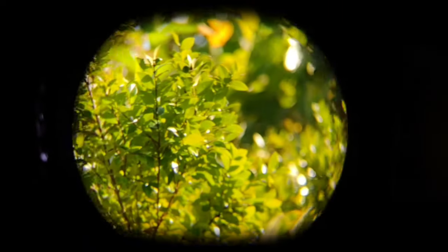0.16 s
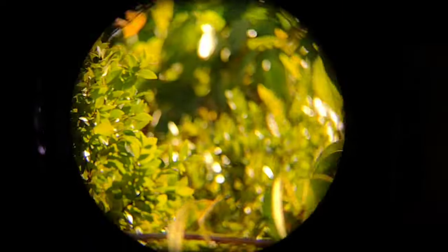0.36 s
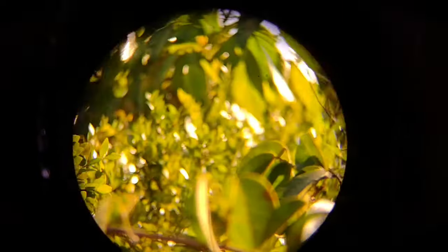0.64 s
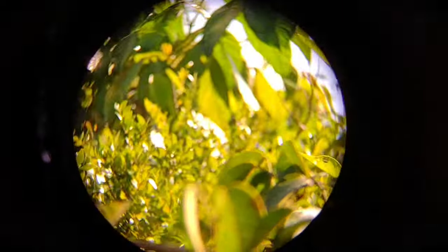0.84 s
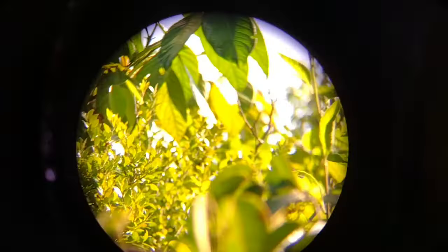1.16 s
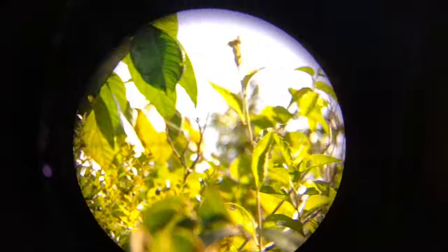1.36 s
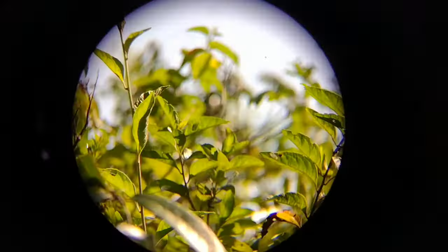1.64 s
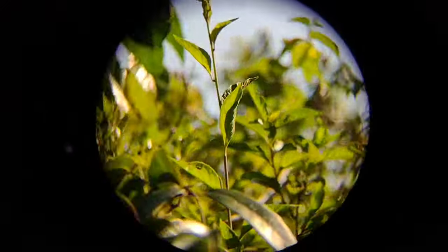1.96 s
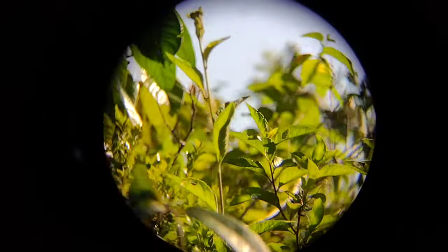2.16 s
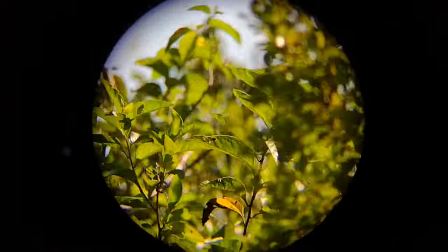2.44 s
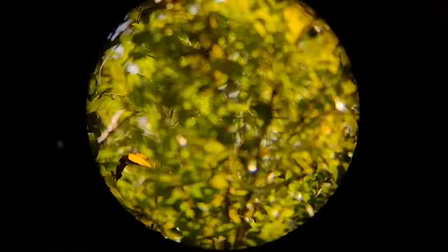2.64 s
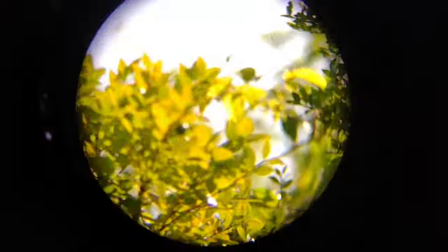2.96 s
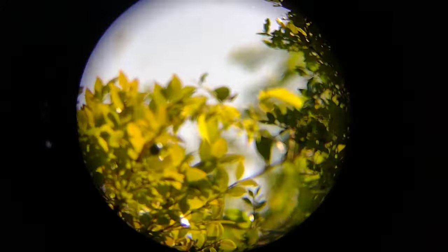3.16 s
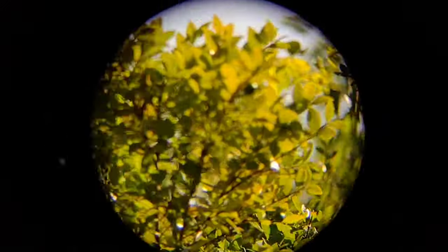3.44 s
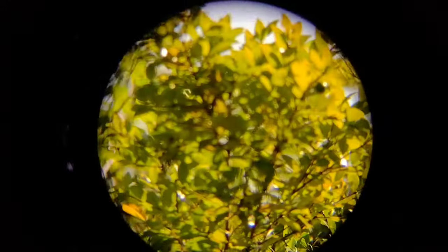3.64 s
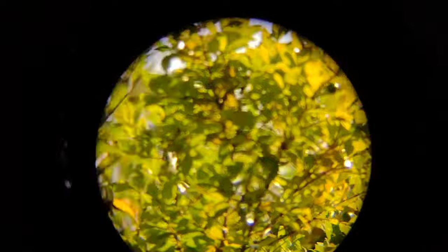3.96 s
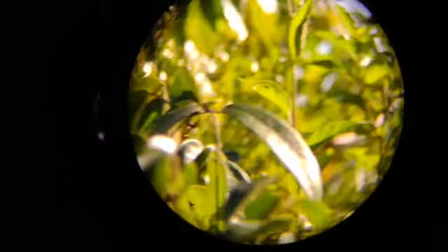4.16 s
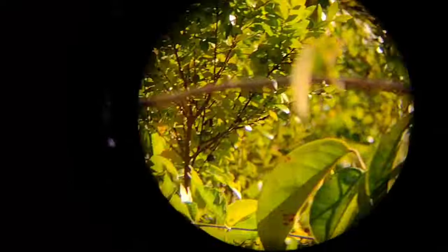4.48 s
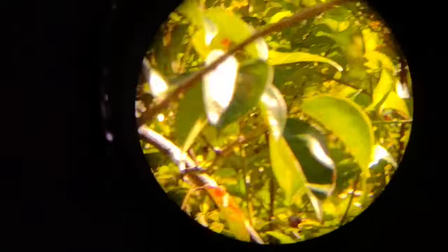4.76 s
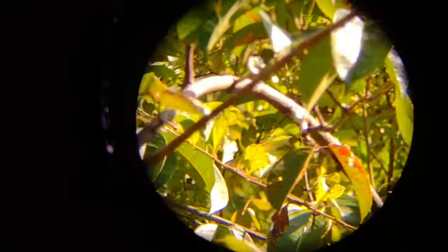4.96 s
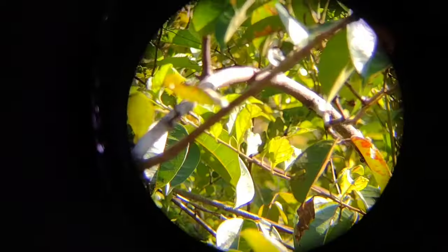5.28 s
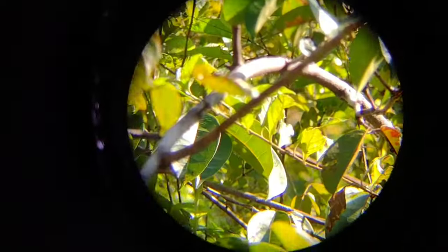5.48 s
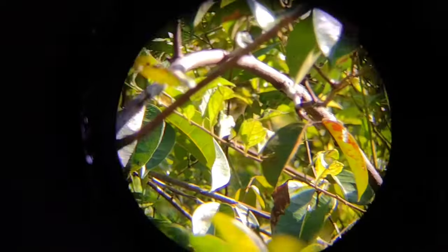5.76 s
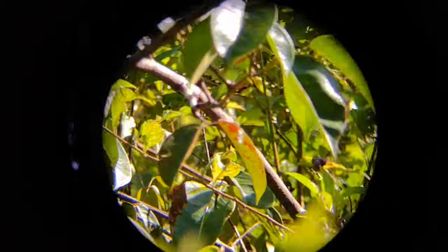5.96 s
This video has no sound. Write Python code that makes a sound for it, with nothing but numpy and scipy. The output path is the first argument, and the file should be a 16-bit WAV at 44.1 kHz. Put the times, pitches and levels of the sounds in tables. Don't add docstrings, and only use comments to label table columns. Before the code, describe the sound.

Close in a thicket, one large bird squawks hoarsely in a steady quick series, each call flaring raspily and snapping into a short falling whistle, with dull throat clicks between. After about three seconds the calls thin to bare whistles and a low breathy chatter takes over to the end. Faint breeze and a short leafy echo; stereo microphone a few steps away, slightly stronger on the right.

```python
import sys
import numpy as np
from scipy import signal
from scipy.fft import rfft, irfft, next_fast_len
from scipy.io import wavfile
from scipy.ndimage import uniform_filter1d, minimum_filter1d, map_coordinates

SR = 44100
rng = np.random.default_rng(int(sys.argv[2]) if len(sys.argv) > 2 else 0)


def pcm_store(signal):
    levels = np.round(np.clip(np.atleast_2d(signal), -1, 1) * 32767)
    wavfile.write(sys.argv[1], SR, levels.astype(np.int16).T)


def rack_gain(trim_db):
    fader = np.asarray(trim_db, float)
    return 10 ** (fader / 20)


N = 269451


def unit(x):
    return x / np.sqrt(np.mean(x ** 2) + 1e-20)


def along(points, hz):
    f, v = np.transpose(points)
    return np.interp(np.log(hz + 1), np.log(f + 1), v)


def curves(rows):
    s, *cols = np.transpose(rows)
    return [np.interp(np.arange(N) / SR, s, c) for c in cols]


def shape(points):
    s, v = (np.transpose(np.broadcast_arrays(*col)).ravel() for col in zip(*points))
    return curves(np.transpose([np.maximum.accumulate(s), v]))[0]


def wobble(rate):
    return map_coordinates(rng.standard_normal(int(N * rate / SR) + 4), [np.arange(N) * rate / SR])


def filtered(x, response):
    m = next_fast_len(N + SR // 10, real=True)
    return irfft(rfft(x, m) * response(np.fft.rfftfreq(m, 1 / SR)), m)[..., :N]


def mode(f, hz, width_hz):
    return 1j * f * width_hz / (hz * hz - f * f + 1j * f * width_hz)


def noise(spectrum):
    return unit(filtered(rng.standard_normal(N), lambda f: rack_gain(along(spectrum, f))))


# frequency_hz, level_db
AIR_SPECTRUM = [(25, -7), (60, 2.5), (150, 5), (400, -2.5), (1000, -5), (2000, -20), (3200, -19),
                (5000, -25), (9000, -17), (16000, -34.5)]
# time_s, level_db
BREEZE = [(0.0, -71), (0.07, -67), (2.16, -73.5), (5.22, -63), (6.09, -64.5), (6.11, -63)]


def air():
    breeze_db, = curves(BREEZE)
    hum = rack_gain(-10.0 + 2.6 * wobble(3.8)) * np.sin(2 * np.pi * 104 * np.arange(N) / SR)
    return rack_gain(breeze_db + 10 + 0.24 * wobble(7.6)) * (noise(AIR_SPECTRUM) + hum)


# frequency_hz, t60_s
LEAF_DECAY = [
    (500, .12),
    (2000, 0.2),
    (3500, 0.32),
    (9000, 0.21),
]


def leaves(x):
    hz, t, z = signal.stft(rng.standard_normal(SR // 2), SR, nperseg=256)
    decay = rack_gain(-60 * t / along(LEAF_DECAY, hz)[:, None])
    tail = signal.istft(z * decay, SR, nperseg=256)[1]
    delayed = np.pad(x, (400, 0))
    return signal.fftconvolve(delayed, tail / np.linalg.norm(tail))[:N]


# time_s, peak_db
CLICKS = [(0.433, -44), (0.654, -47.5), (0.859, -47), (1.085, -47.5), (1.298, -50), (1.52, -50.5),
          (1.743, -50.5), (1.96, -55.5), (2.878, -47)]


def clicks():
    blows = np.zeros(N)
    for s, db in CLICKS:
        blows[round(s * SR)] = rack_gain(db + 31.0)
    return filtered(blows, lambda f: mode(f, 970, 330) - 2.0 * mode(f, 390, 200) + .1 * mode(f, 3300, 900))


# start_s, end_s, from_hz, to_hz, level_db
SLIPS = [(.165, .19, 1000, 600, -42), (.921, .931, 1500, 2300, -39), (.945, .97, 1750, 1500, -24),
         (1.38, 1.425, 1200, 1700, -34), (1.385, 1.408, 2800, 2850, -27), (1.6, 1.645, 1700, 1400, -35),
         (1.845, 1.875, 1500, 1200, -37), (2.06, 2.09, 1400, 1250, -38), (2.058, 2.08, 3000, 2600, -30),
         (1.607, 1.618, 3150, 3500, -25), (1.62, 1.637, 2750, 3100, -26), (.943, .955, 3600, 3500, -22),
         (1.165, 1.176, 3500, 3200, -29), (1.188, 1.205, 2850, 3300, -26), (1.379, 1.39, 3550, 3300, -30),
         (1.91, 1.921, 3450, 3550, -31), (.988, 1.002, 1600, 900, -35), (1.254, 1.268, 1900, 900, -41),
         (1.476, 1.49, 1800, 900, -43), (2.83, 2.841, 1600, 800, -43), (3.262, 3.275, 2100, 1600, -38),
         (1.682, 1.696, 3600, 3600, -33), (2.125, 2.137, 3500, 3550, -30), (2.64, 2.69, 8600, 8020, -56.5),
         (3.165, 3.182, 1200, 1700, -43), (3.395, 3.425, 600, 1700, -41), (1.81, 1.821, 3600, 2200, -41),
         (2.257, 2.268, 3600, 2100, -38), (2.488, 2.5, 3600, 2100, -39), (2.944, 2.955, 3100, 2000, -40),
         (3.468, 3.497, 2150, 1500, -27), (1.846, 1.863, 2950, 2600, -26), (1.165, 1.2, 1900, 1400, -31),
         (4.972, 4.99, 1700, 1700, -37), (4.99, 5.008, 2200, 2150, -37), (5.43, 5.46, 2200, 2100, -37)]


def slips():
    out, tremble = np.zeros(N), wobble(300)

    def bright(hz):
        return .3 * abs(mode(hz, 5650, 600)) ** 2 + .3 * abs(mode(hz, 8500, 900)) ** 2

    for start, end, from_hz, to_hz, db in SLIPS:
        at = slice(round(start * SR), round(end * SR))
        u = np.linspace(0, 1, at.stop - at.start)
        hz = (from_hz + (to_hz - from_hz) * u) * (1 + 0.029 * tremble[at])
        turn = 2 * np.pi * np.cumsum(hz) / SR
        tone = np.sin(turn) + bright(2 * hz) * np.sin(2 * turn) + bright(3 * hz) * np.sin(3 * turn)
        out[at] += rack_gain(db) * np.sin(np.pi * u) ** .5 * tone
    return out


# start_s, strongest_s, end_s, chest_db
PUFFS = [(3.1, 3.126, 3.15, -42.5), (3.199, 3.2, 3.28, -44.5), (3.325, 3.356, 3.395, -40),
         (3.439, 3.491, 3.49, -34), (3.549, 3.561, 3.62, -35.5), (3.643, 3.669, 3.744, -36.5),
         (3.793, 3.85, 3.87, -34.5), (3.911, 3.949, 3.984, -33.5), (4.008, 4.08, 4.096, -34),
         (4.163, 4.245, 4.272, -35), (4.316, 4.38, 4.42, -35), (4.458, 4.5, 4.53, -33.5),
         (4.6, 4.669, 4.69, -34.5), (4.741, 4.773, 4.85, -36), (4.875, 4.894, 4.96, -39),
         (4.957, 4.975, 5.03, -40), (5.011, 5.027, 5.124, -37.5), (5.133, 5.158, 5.225, -34),
         (5.285, 5.322, 5.365, -34.5), (5.407, 5.407, 5.49, -35.5), (5.472, 5.545, 5.56, -37),
         (5.549, 5.58, 5.655, -36), (5.67, 5.669, 5.74, -38.5), (5.727, 5.765, 5.805, -33),
         (5.852, 5.925, 5.98, -34), (6.025, 6.07, 6.105, -32)]
# time_s, lowest_windpipe_resonance_hz
NECK = [(3.1, 930), (3.48, 871.2), (3.56, 700), (3.66, 679.6), (4.38, 692.6), (4.5, 722), (4.7, 729),
        (4.9, 824), (5.0, 814.5), (5.2, 705), (5.44, 707.7), (5.5, 843.5), (5.585, 693.9), (5.64, 863.5),
        (5.75, 758.6), (6.1, 706.7)]
# time_s, level_over_chest_db
HISS = [(3.1, 5), (3.7, 3), (4.3, 4), (4.9, 3.5), (4.98, -1), (5.05, 5), (5.3, 3.5), (5.44, 2.5),
        (5.5, 0.5), (5.64, 2.5), (5.69, 6), (6.1, 2)]


def puffing():
    t = np.arange(0, N / SR, 1 / 1000)
    chest_power, breath_power, slide = 0 * t, 0 * t, []
    for start, top, end, chest_db in PUFFS:
        top = np.clip(top, start + .014, end - .014)
        hz = np.interp(top, *np.transpose(NECK))
        breath_db = chest_db + np.interp(top, *np.transpose(HISS))
        times = [start - .05, start - .008, start, start + .012, top, end - .01, end, end + .014, end + .06]
        swell_db = np.interp(t, times, [-65, -22.5, -9, -7.5, 0.0, -7.5, -15.0, -20.5, -45])
        chest_power += rack_gain(chest_db + swell_db) ** 2
        times = [start - .06, start - .002, start + 0.011, top + 0.0067, end + 0.0025, end + 0.05, end + 0.11]
        swell_db = np.interp(t, times, [-48.5, -15.0, -5.5, 1.0, -4.5, -14.0, -47])
        breath_power += rack_gain(breath_db + swell_db) ** 2
        if start < 3.5:
            slide += [(start, 600), (top, hz), (end, 620)]
        else:
            slide += [(start, hz + 0.57 * (930 - hz)), (top, hz), (end, hz + 20)]
    pipe_hz, = curves(slide)
    return *curves(np.transpose([t, chest_power, breath_power])), pipe_hz


# frequency_hz, width_hz, level_db
PIPE = [
    (1265, 150, -5.5),
    (2150, 404, 3),
    (2950, 208, -1),
    (3700, 340, -8),
    (4250, 630, -9.5),
    (6300, 4550, -13),
    (9490, 5400, -16),
]


def chatter():
    chest_power, breath_power, pipe_hz = puffing()

    def flutter(depth_db):
        return rack_gain(depth_db * np.tanh(wobble(95)))

    def pipe(f, modes):
        return sum((-1) ** k * rack_gain(db) * mode(f, hz, w) for k, (hz, w, db) in enumerate(modes))

    def ridges(f, centres_hz):
        return np.prod([1 + .7 * mode(f, hz, 120) for hz in centres_hz], axis=0)

    def throat_response(f):
        bands = pipe(f, PIPE[:2]) * ridges(f, [1410, 2080])
        return bands * mode(f, 2200, 4100) / (1 + (f / 4500) ** 4)

    def breath_response(f):
        bands = pipe(f, PIPE[2:]) * ridges(f, [2930, 3400]) * mode(f, 4100, 7600)
        dips = (1 - 0.35 * mode(f, 4940, 600)) * (1 - .6 * mode(f, 7300, 600))
        return bands * dips / (1 + (f / 9800) ** 9)

    shared = flutter(1.57)
    puff = rng.standard_normal(N) * shared * flutter(0.39)
    steps_hz, chest = [670, 780, 900], 0
    for hz, row in zip(steps_hz, np.eye(3)):
        near = np.interp(pipe_hz, steps_hz, row)
        chest = chest + np.sqrt(near) * unit(filtered(puff, lambda f: mode(f, hz, 198) ** 3))
    hum = 2 * np.pi * np.cumsum(pipe_hz + 45 * wobble(80)) / SR
    column = sum(share * flutter(5) * np.sin(k * hum) for k, share in enumerate([.8, .3, .3, .3], 1))
    chest = unit(flutter(2) * chest + column)
    throat = unit(filtered(puff, throat_response))
    breath = unit(filtered(rng.standard_normal(N) * shared, breath_response))
    both = np.sqrt(np.sqrt(chest_power * breath_power))
    return rack_gain(2) * np.sqrt(chest_power) * chest + rack_gain(5) * both * throat + rack_gain(-1.5) * np.sqrt(breath_power) * breath


# start_s, strongest_s, end_s, rasp_db, undertone_db
SQUAWKS = [(0.076, 0.108, 0.18, -33, -21), (0.282, 0.342, 0.39, -39, 1.5), (0.492, 0.522, 0.61, -35.5, 1),
           (0.707, 0.762, 0.81, -35.5, -4.5), (0.927, 0.969, 1.038, -32, -1),
           (1.157, 1.19, 1.256, -33, -12), (1.38, 1.408, 1.478, -34.5, -4.5),
           (1.593, 1.634, 1.696, -33.5, -2), (1.819, 1.865, 1.926, -34.5, -8),
           (2.039, 2.083, 2.138, -36, -1.5), (2.264, 2.317, 2.369, -36.5, -3),
           (2.497, 2.543, 2.592, -36.5, -11), (2.725, 2.775, 2.833, -35.5, -7.5),
           (2.952, 3.005, 3.064, -34.5, -10.5), (3.179, 3.206, 3.293, -37.5, -12),
           (3.429, 3.447, 3.472, -41.5, -8), (3.652, 3.67, 3.76, -35, -15)]
# strongest_s, from_hz, to_hz, level_db, catch_hz
OPENINGS = [(.093, 1610, 2142, -34, 2300), (0.297, 1743, 1803, -23, 1770), (.517, 1881, 2294, -14, 2620),
            (.726, 2220, 1860, -21.5, 1850), (.96, 2102, 2237, -13, 2000), (1.176, 2150, 1957, -22, 2261),
            (1.425, 2480, 2200, -17, 2250), (1.612, 2358, 2248, -27, 2302),
            (1.843, 2015, 2082, -15.5, 2230), (2.058, 2062, 2061, -16.5, 2097),
            (2.282, 1975, 2090, -15.5, 2438), (2.516, 2036, 2252, -15.5, 2094),
            (2.765, 2106, 2105, -15, 2178), (2.972, 2010, 2218, -18, 2099),
            (3.188, 1965, 2030, -25.5, 2115), (3.431, 2226, 2263, -18, 2232),
            (3.675, 2150, 2150, -16.5, 2150)]
# break_s, let_go_s, from_hz, to_hz, level_db
WHISTLES = [(.11, .147, 2400, 1338, -14.5), (0.326, 0.349, 1890, 1440, -14),
            (0.556, 0.573, 2087, 1529, -10.5), (0.747, 0.779, 2100, 1634, -11.5),
            (.998, 1.014, 2149, 1760, -8.5), (1.21, 1.228, 2235, 1833, -8),
            (1.437, 1.456, 2111, 1922, -9.5), (1.655, 1.677, 2227, 1805, -8),
            (1.886, 1.906, 2198, 1983, -11), (2.102, 2.115, 2224, 1801, -10),
            (2.323, 2.347, 2160, 1850, -11.5), (2.549, 2.576, 2280, 1895, -9.5),
            (2.778, 2.81, 2185, 1838, -10.5), (3.003, 3.043, 2162, 1881, -10),
            (3.198, 3.231, 2285, 1929, -30), (3.432, 3.463, 2202, 2060, -25),
            (3.676, 3.707, 2124, 1750, -25)]
# flare_s, flare_hz, flare_db, return_hz, return_db
FLARES = [(.102, 3533, -13.5, 3510, -29), (.292, 3425, -19, 3300, -40), (.515, 3460, -18, 3810, -42),
          (0.746, 3320, -21, 3400, -33), (.974, 3128, -12, 3377, -43), (1.195, 3350, -21, 3400, -41),
          (1.422, 3306, -13.5, 3300, -44), (1.635, 2974, -23.5, 3555, -44), (1.87, 3054, -23.5, 3220, -40),
          (2.08, 2913, -21, 3510, -40), (2.322, 3504, -23.5, 3400, -35), (2.542, 3350, -25.5, 2900, -50),
          (2.766, 3280, -25.5, 2950, -31.5), (3.02, 3250, -27.5, 2820, -47), (3.193, 3503, -32, 2963, -35),
          (3.436, 3400, -25, 3160, -23.5), (3.667, 3207, -24.5, 3223, -47.5)]
# time_s, low_voice_hz, level_db
FREE = [
    [(.075, 1660, -33.5), (.087, 1704, -32.5), (.093, 2060, -30), (.109, 2382, -27), (.119, 2300, -21),
     (.135, 2084, -21), (.151, 1716, -22), (.172, 1230, -32), (.178, 1154, -48)],
    [(.282, 1800, -38), (.29, 1804, -27), (.3, 1768, -25), (.307, 1535, -33), (.315, 1893, -19.5),
     (.345, 1713, -16.5), (.36, 1412, -23.5), (.378, 1810, -23), (.388, 1870, -46)],
    [(.49, 1820, -35), (.504, 2002, -21), (.53, 2487, -30.5), (.551, 2570, -30), (.555, 2083, -16),
     (.567, 1940, -11.5), (.576, 1646, -19.5), (.6, 1518, -27.5), (.61, 1515, -42)],
    [(.711, 2268, -36.5), (.722, 1802, -26), (.729, 1946, -24), (.736, 1865, -24), (.74, 2186, -15),
     (.749, 2186, -18), (.754, 1910, -15), (.782, 1729, -16), (.81, 1632, -29)],
    [(2.266, 2053, -33), (2.272, 1940, -25), (2.283, 2190, -19), (2.288, 2543, -29.5), (2.318, 2313, -25),
     (2.326, 2150, -14), (2.35, 1969, -14), (2.361, 1763, -28.5), (2.37, 1830, -39.5)],
    [(2.716, 3603, -49), (2.725, 2502, -41), (2.74, 2105, -41.5), (2.758, 1961, -34.5), (2.77, 2203, -20.5),
     (2.785, 2177, -16), (2.81, 1896, -12.5), (2.822, 1803, -23.5), (2.833, 1907, -38)],
]
# time_s, low_voice_hz, level_db
BARE = [
    [(1.815, 2050, -42), (1.83, 2050, -27), (1.845, 2130, -20), (1.849, 2100, -42), (1.862, 2200, -40),
     (1.871, 2200, -24), (1.884, 2100, -31), (1.888, 2200, -16), (1.906, 2090, -17)],
    [(3.178, 1900, -48), (3.186, 1980, -31), (3.191, 2400, -44), (3.197, 2270, -21), (3.222, 2123, -15),
     (3.24, 1950, -16.5), (3.262, 2160, -31), (3.272, 2140, -58)],
    [(3.426, 2500, -44), (3.431, 2280, -20), (3.437, 2158, -17), (3.447, 2088, -17), (3.463, 2130, -20),
     (3.469, 2185, -40)],
    [(3.65, 1742, -43), (3.664, 1574, -33), (3.671, 1650, -38), (3.678, 2000, -17), (3.686, 2111, -14.5),
     (3.708, 2130, -16), (3.724, 2091, -25), (3.736, 1735, -44)],
]
RASP_SHAPE_DB = [-19, -5, 1, -5, -18.5]


def controls():
    start, top, end, rasp, under = np.transpose(SQUAWKS)
    note, first_hz, note_hz, note_db, catch_hz = np.transpose(OPENINGS)
    snap, go, from_hz, to_hz, db = np.transpose(WHISTLES)
    flare, flare_hz, flare_db, back_hz, back_db = np.transpose(FLARES)
    gap, fall = note + 0.295 * (snap - note), (go + end) / 2
    brink = np.maximum(snap - 0.0058, gap)
    chirp_hz = 800 * (start > 2.2)
    hook_hz, wander_hz = 118.1, 44.9

    def level(points, drops_db):
        first_db, last_db = points[0][1], points[-1][1]
        return shape([(start - .007, first_db - 50), (start - .003, first_db - 14), *points,
                      (end + 0.022, last_db - drops_db[0]), (end + 0.083, last_db - drops_db[1])])

    low_hz = shape([(start - .007, first_hz + 3 * chirp_hz), (start - .003, first_hz + chirp_hz),
                    (start, first_hz), (note, note_hz), (gap, catch_hz), (brink, catch_hz),
                    (snap, from_hz), (fall, to_hz), (end, to_hz + hook_hz * (start > .2)),
                    (end + 0.07, to_hz + hook_hz)]) + wander_hz * wobble(70)
    gap_db = note_db - 7
    low_db = level([(start, np.minimum(db - 23, note_db)), (note, note_db), (gap, gap_db),
                    (brink, gap_db + 3.0), (snap, db), (go, db - 3.5), (fall, db - 11), (end, db - 25)],
                   [40, 70])
    for rows in FREE + BARE:
        at, (hz, db) = slice(round(rows[0][0] * SR), round(rows[-1][0] * SR)), curves(rows)
        low_hz[at] = hz[at]
        low_db[at] = db[at] + 0.5 + 9.5 * abs(mode(hz[at], 2500, 420)) ** 2
    rise = (start + flare) / 2
    high_hz = shape([(start, 3350), (rise, 0.89 * flare_hz), (flare, flare_hz), (go, back_hz),
                     (end + 0.11, back_hz)])
    hush = np.minimum(flare + 0.022, (flare + go) / 2)
    high_db = level([(start, flare_db - 22), (rise, flare_db - 10.5), (flare, flare_db),
                     (hush, np.maximum(flare_db - 17.5, back_db - 13.0)), (go, back_db),
                     (end, back_db - 10.5)], [40, 70])
    times = [start, (start + top) / 2, top, top + 0.5 * (end - top), end]
    rasp_db = level([(s, rasp + d) for s, d in zip(times, RASP_SHAPE_DB)], [9, 30])
    late = shape([(start, 0), (snap, 0.022 + 0 * snap), (go, .4), (end, 1)])
    return low_hz, low_db, high_hz, high_db, rasp_db, late, shape([(start, under), (end, under)])


# start_s, end_s, half_pitch_db, odd_halves_above_db, rasp_change_db
CLEAR = [(0.078, 0.089, -53, -33, 8), (0.097, 0.109, -23, 1.5, -2.5), (0.143, 0.164, -35, -32, -1.5),
         (0.283, 0.298, -33, -39, 7.5), (0.31, 0.354, -59, -47, -1), (0.496, 0.507, -47, -33, -6),
         (0.53, .553, -15, -10.5, -2), (.712, .737, -45.5, -46, -3), (0.744, 0.75, -29, -10.5, -6),
         (0.75, .783, -63, -42.5, -4.5), (.925, 0.944, -50, -28, -4), (1.383, 1.405, -43, -47, 2.5),
         (1.818, 1.846, -58, -40, -1), (2.044, 2.06, -61, -40, 1.5), (2.272, 2.284, -47, -42, 3),
         (2.287, 2.324, -25.5, -27, 1.5), (2.502, 2.518, -50.5, -30, 5), (2.788, 2.822, -41, -22, 1),
         (2.959, 2.976, -52, -23, -1), (3.198, 3.264, -47, -24, 0), (3.429, 3.465, -45, -18.5, 2.5)]


def steady():
    start, end, *cols = np.transpose(CLEAR)
    edge_s = .002
    clear = shape([(start - edge_s, 0 * start), (start, 1), (end - edge_s, 1), (end, 0)])
    return clear, *(shape([(start, c), (end, c)]) for c in cols)


# time_s, octave_db
OCTAVE = [(0, -0.5), (.3, -5.5), (.6, -11), (.8, -8), (.9, -21), (1.7, -32.5), (2.3, -36), (2.8, -22.5),
          (3.8, -25)]


def low_voice(low, low_hz, late, under_db, clear, half_db, odd_db):
    def throat(k):
        return abs(mode(k * low_hz, 3400, 770)) ** 2

    half = rack_gain(-44.0 + under_db + 34.5 * late + 5.7 * wobble(24.98)) * np.sin(low / 2)
    half += rack_gain(-61.5) * np.sin(5 * low / 2)
    half += rack_gain(-47.0 + 1.6 * wobble(42)) * throat(3 / 2) * np.sin(3 * low / 2)
    odd = np.sqrt(throat(3 / 2)) * np.sin(3 * low / 2) + rack_gain(-24.0) * np.sin(5 * low / 2)
    half += clear * (rack_gain(half_db) * np.sin(low / 2) + rack_gain(odd_db) * odd)
    octave_db, = curves(OCTAVE)
    third_db, = curves([(.25, -0.5), (.33, -5), (.5, -0.5)])
    third_db = third_db - 26.5 + 7.1 * clear + octave_db + 5.2 * wobble(72)
    overtones = rack_gain(octave_db) * throat(2.042) * np.sin(2 * low) + rack_gain(third_db) * np.sin(3 * low)
    return np.sin(low) + half + overtones


# frequency_hz, level_db
RASP_SPECTRUM = [(500, -18), (900, -15), (1500, -8), (2200, 16), (3300, 3), (4300, -7), (5400, -3),
                 (6600, -26.5), (9000, -0.5), (10500, -20), (11500, -40.5), (13000, -44.5), (16000, -57.5)]


def rasping(low, low_hz, clear, wild):
    beat = np.diff(low // (4 * np.pi), prepend=0)
    uneven = (1 - .8 * clear) * (1 + .6 * wild * np.sin(low / 4 + 1)) * rack_gain(1.5 * wobble(900))
    puffs = beat * uneven / np.sqrt(low_hz / 2 / SR)
    voiced = .35
    mixed = np.sqrt(voiced) * puffs + np.sqrt(1 - voiced) * rng.standard_normal(N)
    rasp = unit(filtered(mixed, lambda f: rack_gain(along(RASP_SPECTRUM, f)) * (1 - 1.6 * mode(f, 6170, 800))))
    beak_db, = curves([(0, -13), (.8, -15.5), (1.4, -35)])
    beak = unit(filtered(rng.standard_normal(N), lambda f: mode(f, 5880, 1200) ** 2))
    return rasp + rack_gain(beak_db) * beak


def gaping(cry):
    gape, = curves([(.85, .97), (1.0, 0.69), (1.6, 0.58), (2.0, 0.1)])
    narrow, = curves([(.9, 0), (1.15, 1)])
    wide, tight = filtered(cry, lambda f: (1 - np.array([mode(f, 4310, 650), mode(f, 4080, 400)])) ** 2)
    return (1 - gape) * cry + gape * ((1 - narrow) * wide + narrow * tight)


def squawks():
    low_hz, low_db, high_hz, high_db, rasp_db, late, under_db = controls()
    clear, half_db, odd_db, rasp_change_db = steady()
    chaos = 1 / (1 + np.exp(-(rasp_db - np.maximum(low_db, high_db) + 20.5) / 1.8))
    wild = chaos * (1 - clear)
    chaos = np.maximum(chaos, .12 + .45 * late) * (1 - .85 * clear)
    high_db = high_db - 25 * clear
    rasp_db = rasp_db + rasp_change_db * clear
    flap = 2 * np.pi * np.cumsum(420 + 140 * wobble(70)) / SR

    def phase(hz, spread_hz):
        return 2 * np.pi * np.cumsum(hz + (10 + spread_hz * chaos) * wobble(260)) / SR

    def shake():
        uneven_db = (.6 + 4 * chaos) * np.tanh(wobble(300)) - 2.5 * chaos
        return rack_gain(uneven_db) * (1 + .8 * wild ** 2 * np.sin(flap))

    low, high = phase(low_hz, 115), phase(high_hz, 160)
    voice = rack_gain(low_db + 6.0) * shake() * low_voice(low, low_hz, late, under_db, clear, half_db, odd_db)
    voice += rack_gain(high_db + 3) * shake() * (np.sin(high) + rack_gain(-40.5) * np.sin(2 * high))
    pairs = [(-1, 1, -48), (1, 1, -15), (2, 1, -24), (1, 2, -20)]
    mixed = sum(rack_gain(db) * np.sin(a * low + b * high) for a, b, db in pairs)
    voice += rack_gain(np.minimum(low_db, high_db) + 1.5) * shake() * mixed
    voice = filtered(voice, lambda f: 1 / (1 + (720 / (f + 1)) ** 4) / (1 + (f / 10300) ** 12))
    rasp = rack_gain(rasp_db + 12.5 + 2.17 * wobble(500)) * rasping(low, low_hz, clear, wild)
    return gaping(voice + rasp)


def scene():
    bird = squawks() + slips() + chatter() + clicks()
    return np.tile(bird + rack_gain(-29) * leaves(bird) + air(), (2, 1))


def band_limit(x):
    return signal.sosfilt(signal.butter(12, 15900, fs=SR, output="sos"), x)


# reflection_share, delay_s, level_db
PORTS = [
    (.72, .000389, -4.6),
    (.68, .000426, 0),
]


def record(dry):
    def housing(f):
        comb = np.array([rack_gain(db) * (1 - share * np.exp(-2j * np.pi * f * delay))
                         for share, delay, db in PORTS])
        cavity = np.array([1 + .4 / (1 + 1j * f / 350), 1 - .6 * mode(f, 1860, 1300)])
        return comb * cavity

    hiss = rack_gain(-84) * rng.standard_normal(dry.shape)
    heard = filtered(dry, housing) + hiss
    swing = uniform_filter1d(-minimum_filter1d(-abs(heard).max(0), size=70), size=60)
    rounded = heard / (1 + (swing / .45) ** 4) ** (1 / 4)
    mix = filtered(rounded, lambda f: f < 15780)
    return band_limit(mix)


dry = scene()
out = record(dry)
pcm_store(out)
```